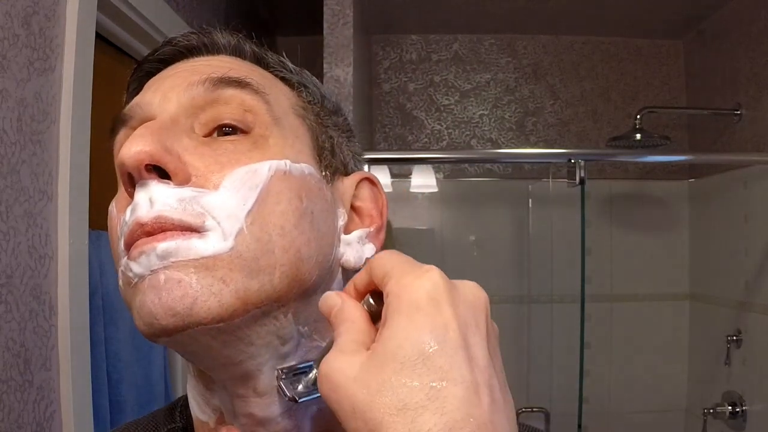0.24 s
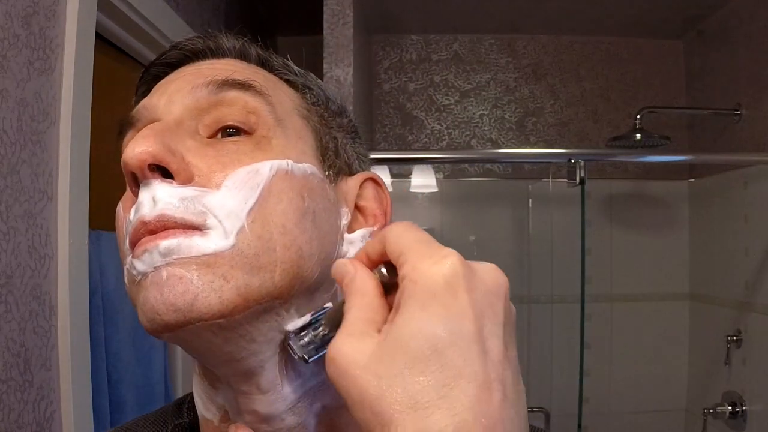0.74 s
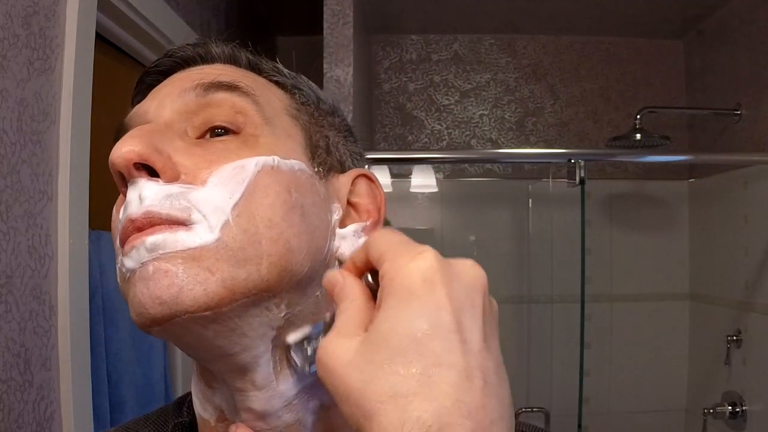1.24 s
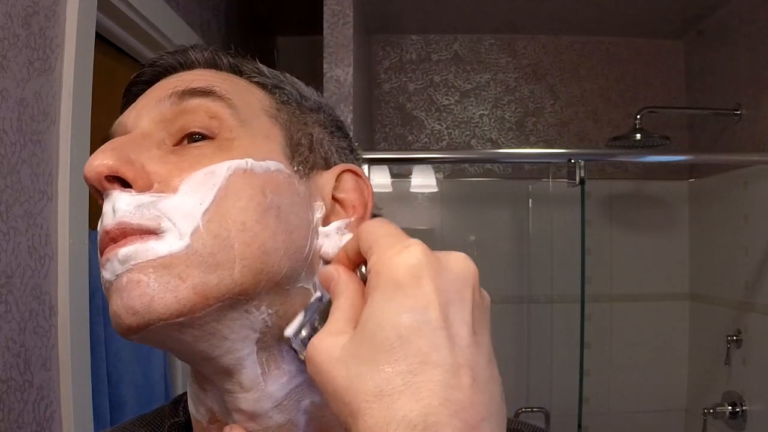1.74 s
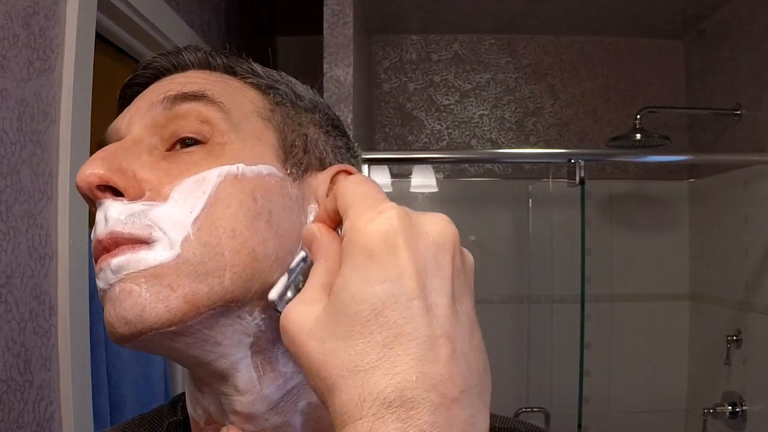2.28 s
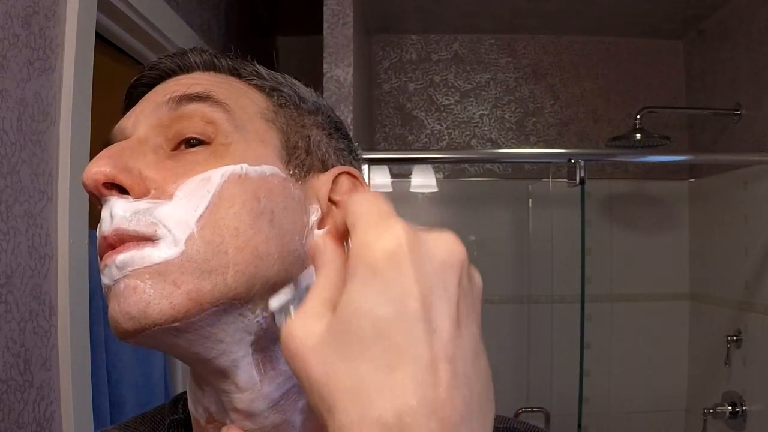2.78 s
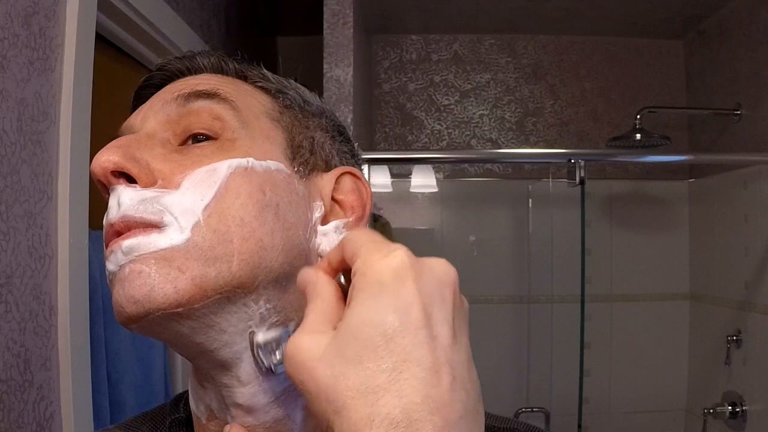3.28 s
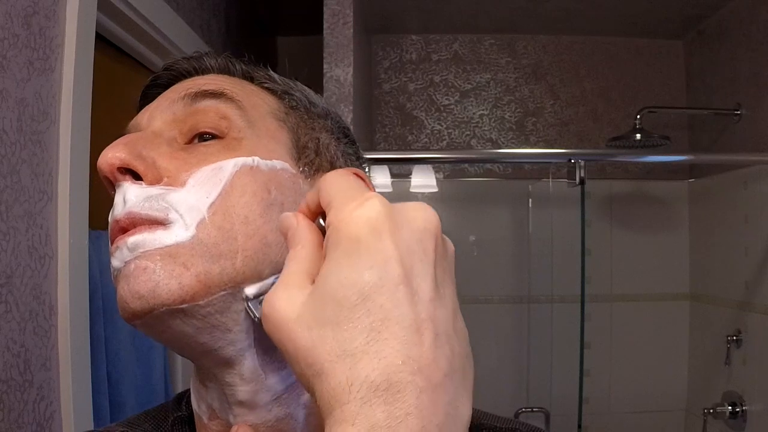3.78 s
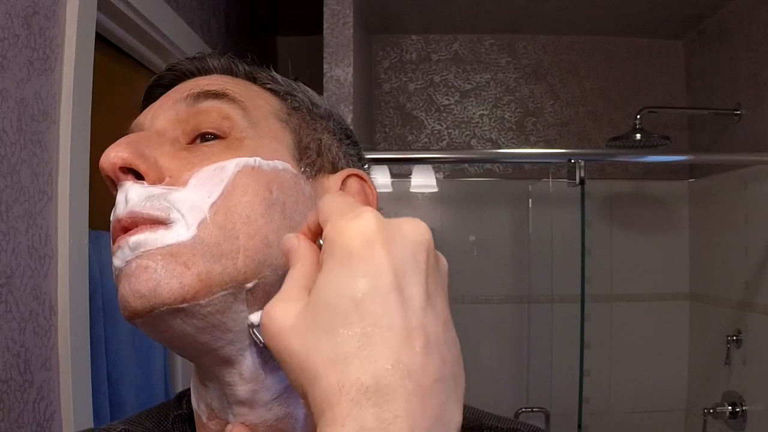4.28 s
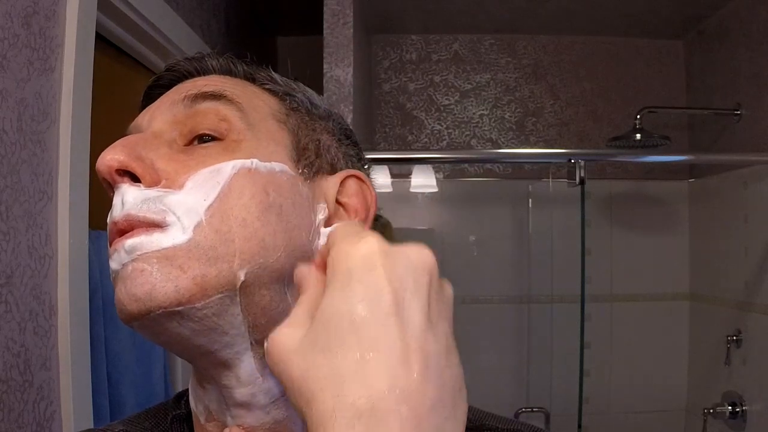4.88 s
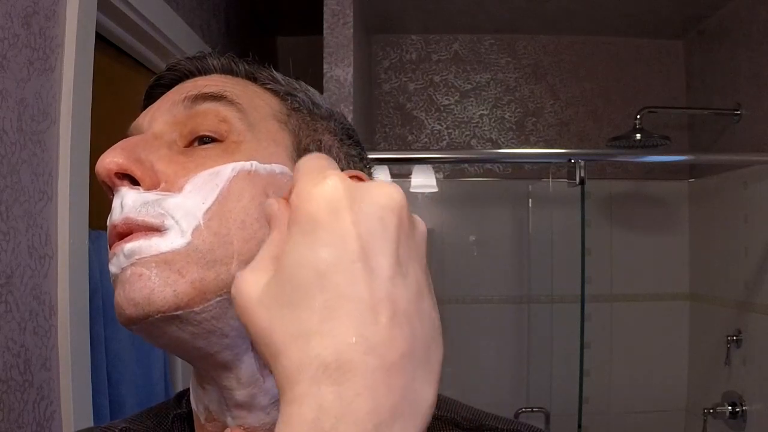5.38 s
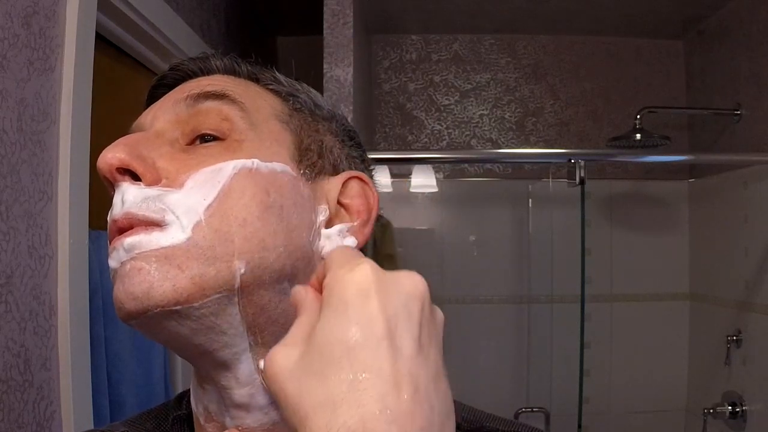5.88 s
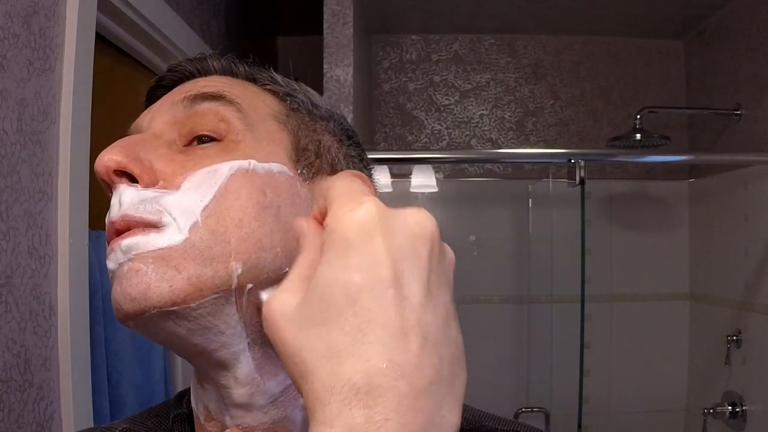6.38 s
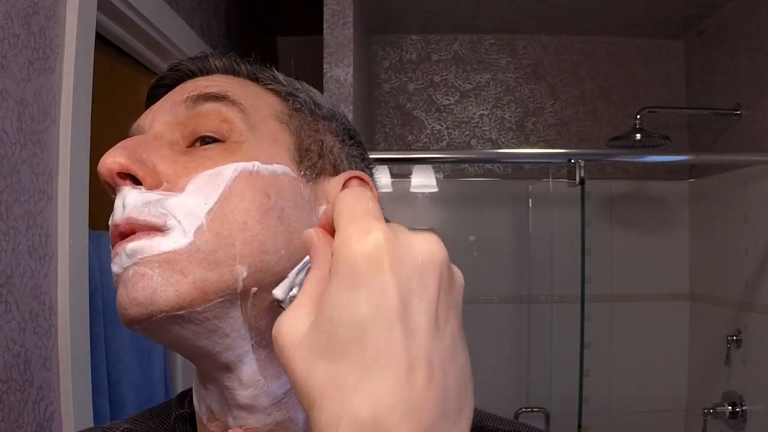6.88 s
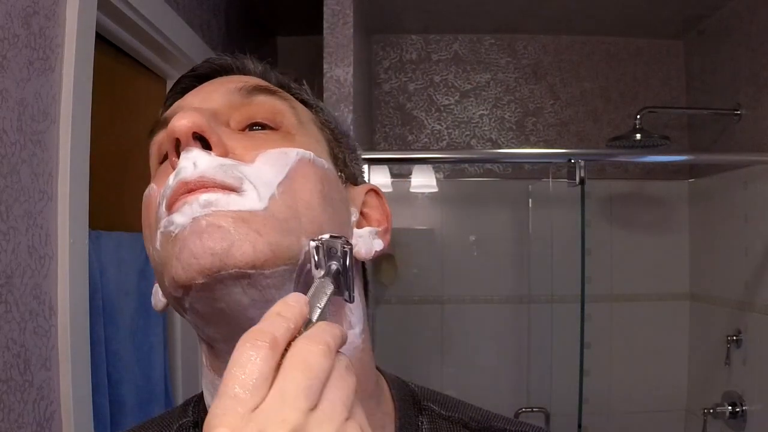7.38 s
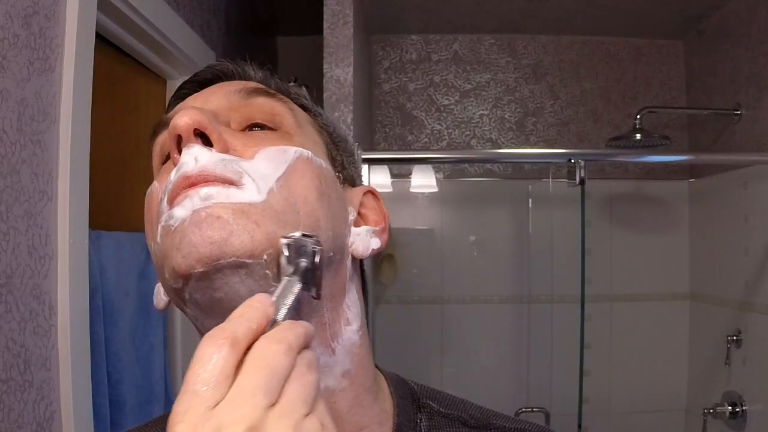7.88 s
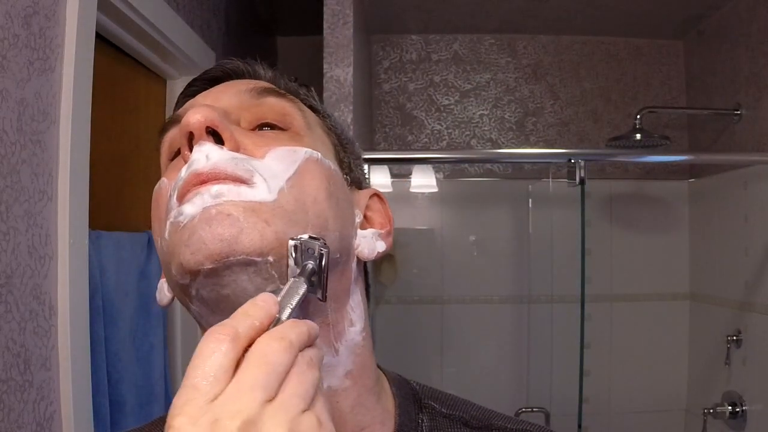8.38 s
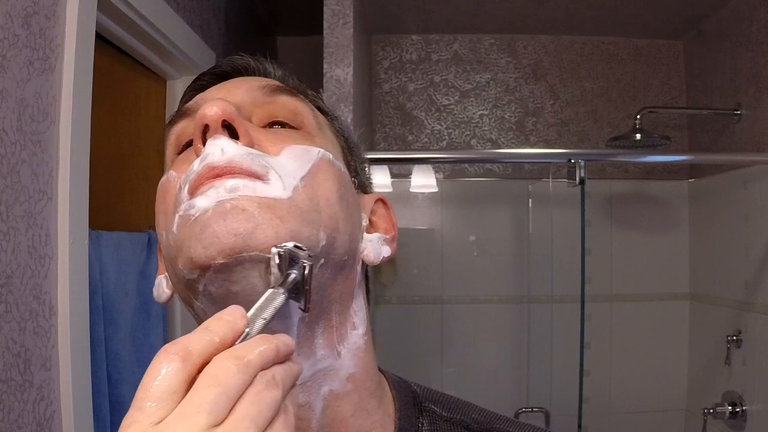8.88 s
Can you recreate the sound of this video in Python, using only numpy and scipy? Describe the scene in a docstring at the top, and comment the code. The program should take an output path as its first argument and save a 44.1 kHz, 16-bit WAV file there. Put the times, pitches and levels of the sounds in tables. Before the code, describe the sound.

Close, crisp razor strokes rasp through stubble with tiny ticks, while a low ventilation drone and hiss fill a tiled bathroom.

```python
"""A steel safety razor shaves lathered stubble in a small tiled bathroom, heard close and nearly in mono.
From the outset, ventilation drones behind a steady hiss. Short flicks on the neck come first: whiskers
snap at the blade and ring the razor head, while the moving arm rustles softly. Long pulls follow from
about 3 s, one ending in a squeak, then three short strokes on the jaw. At 7 s the hand changes grip,
and three coarser strokes pass under the chin."""
import sys
import numpy as np
from scipy import signal
from scipy.fft import rfft, irfft, next_fast_len
from scipy.io import wavfile
from scipy.ndimage import map_coordinates

SR = 44100
rng = np.random.default_rng(int(sys.argv[2]) if len(sys.argv) > 2 else 0)


def unload_wav(signal):
    """Save mono or channel-first audio to the path in sys.argv[1] as 16-bit WAV at rate SR, clipped to [-1, 1]."""
    wavfile.write(
        sys.argv[1],
        SR,
        np.round(np.clip(np.atleast_2d(signal).T, -1, 1) * 32767).astype(np.int16),
    )


N = 403074
T = np.arange(N) / SR

# Stereo width. Each row: frequency in Hz, side relative to mid in dB.
STEREO_WIDTH = [(25, -14.5), (60, -28.5), (130, -21.5), (300, -18.5), (600, -18), (1200, -13), (2500, -29),
                (6000, -22.5), (10000, -18.5), (14000, -33)]
# Spectrum of the scrape in a long pull. Each row: frequency in Hz, relative level in dB.
PULL_SPECTRUM = [(1200, -18), (2000, -15), (2700, -11.5), (3200, -3), (4100, -6), (5100, -3), (6100, -1.5),
                 (7300, -1.5), (7600, 4.5), (9100, 2.5), (10400, 1.5), (11700, 0.5), (13000, 0.5),
                 (14600, -0.8)]
# Damped modes of the razor head on the neck. Each row: frequency in Hz, width in Hz, lift in dB.
NECK_MODES = [(2350, 200, 3), (5080, 600, 7.5)]
# Razor strokes. Each row: start, length and bite-in time in seconds; level, swell from start to end,
# mid-stroke arch, relative low rasp, relative sharp top and arm rub, all in dB; kind of stroke.
RAZOR_STROKES = [ (0.502, 0.04, 0.006, -52, -5, 0.5, -20, 0, -62.5, "flick"),
                 (0.75, 0.086, 0.059, -45, -2.5, 0.5, -13.5, -1.5, -58, "flick"),
                 (1.04, 0.093, 0.073, -45.5, -0.5, 2, -11.5, -3.5, -57.5, "flick"),
                 (1.331, 0.101, 0.045, -48, 1.5, 1.5, -11, -4.5, -60.5, "flick"),
                 (1.616, 0.094, 0.048, -51.5, 3.5, 3, -10.5, -6, -62.5, "flick"),
                 (1.895, 0.14, 0.07, -58, 2, 0, -10, -3.5, -66, "flick"),
                 (2.218, 0.092, 0.05, -56, 7.5, -1, -12, -1.5, -72, "flick"),
                 (2.489, 0.053, 0.07, -47.5, 1.5, 1.5, -12, 0, -62, "flick"),
                 (2.715, 0.036, 0.026, -46.5, -0.5, 0, -11.5, 4.5, -63, "flick"),
                 (3.171, 0.13, 0.073, -50, -5, 2, -9.5, -3, -59.5, "pull"),
                 (3.472, 0.49, 0.085, -49, 7, 0.4, -11.5, -2, -61, "pull"),
                 (4.201, 0.59, 0.13, -48.5, -2.5, 1.2, -13, 0, -60.5, "pull"),
                 (5.074, 0.59, 0.06, -50.4, -1.5, 2.6, -12.8, 0, -62, "pull"),
                 (6.011, 0.3, 0.085, -52.5, 4, 1.5, -9.5, 3, -61, "pull"),
                 (6.328, 0.089, 0.082, -50.5, -8, -1, -4, -1, -72, "jaw"),
                 (6.622, 0.081, 0.074, -48.5, 1, 2, -2.5, 0, -58.5, "jaw"),
                 (6.886, 0.049, 0.06, -62, -2, 2, -11, 0, -76, "jaw"),
                 (7.662, 0.21, 0.011, -49.5, 6.5, -2.5, -3.5, 6, -65.5, "chin"),
                 (8.121, 0.19, 0.03, -49, 3.5, 3.5, -7.5, 1.5, -65, "chin"),
                 (8.543, 0.326, 0.036, -48.5, -5, -1, -8.5, 1, -66.5, "chin"), ]


def amp(db):
    """Amplitude grows tenfold for every 20 dB."""
    return 10 ** (np.asarray(db) / 20)


def unit(x):
    """Normalisation to an rms of 1."""
    return x / np.sqrt(np.mean(x ** 2) + 1e-20)


def along(points, hz):
    """Interpolation of (Hz, value) points on a logarithmic frequency axis."""
    freqs, values = np.transpose(points)
    return np.interp(np.log(hz + 1), np.log(freqs + 1), values)


def wobble(rate):
    """Smooth random modulation: a spline through `rate` Gaussian knots a second."""
    return map_coordinates(rng.standard_normal(int(N * rate / SR) + 4), [T * rate])


def lowpass(hz, corner_hz, order):
    """Low-pass gain: one half at the corner, a power-law roll-off above it."""
    return 1 / (1 + (hz / corner_hz) ** order)


def filtered(x, response):
    """Linear filtering: the spectrum of x is multiplied by a frequency response."""
    size = next_fast_len(N + SR // 2)
    return irfft(rfft(x, size) * response(np.fft.rfftfreq(size, 1 / SR)), size)[..., :N]


def coloured_noise(response):
    """Spectrally shaped stereo noise of rms 1; a weak side signal keeps it nearly mono."""
    def mid_and_side(hz):
        return response(hz) * np.array([np.ones(len(hz)), amp(along(STEREO_WIDTH, hz))])
    mid, side = filtered(rng.standard_normal((2, N)), mid_and_side)
    return unit(np.array([mid + side, mid - side]))


def ventilation(low_trim_db=-0.1, high_trim_db=-0.4, duct_db=-68, hiss_db=-54):
    """Resonance: ventilation drives the room's low modes into a wavering drone under an even hiss."""
    # Slow wavering. Each row: time in seconds, low and upper drone levels in dB before trim.
    wavering = [(0.0, -46, -67), (0.16, -61, -61.5), (0.48, -50, -55.6), (0.96, -60, -57.2),
                (1.92, -49.5, -58), (2.4, -59, -59), (3.03, -52.5, -60), (3.19, -51, -56.5),
                (5.11, -56, -53), (6.23, -62, -60), (6.55, -54, -50), (7.18, -56.5, -60.5),
                (7.5, -56.4, -55.5), (9.14, -53.1, -57.5)]
    # Room and duct modes. Each row: frequency in Hz, width in Hz, relative level in dB.
    low_modes = [(61, 3.9, -2), (71.8, 14, -16.5)]
    high_modes = [(101.3, 20, -4.5), (130.4, 11.5, -2.5)]
    duct_modes = [(212.4, 10.8, 4.5), (236, 15, -8), (276, 12, -1.5), (295.5, 15, -0.5), (427, 8.4, -20.5)]
    # Spectrum of the hiss. Each row: frequency in Hz, relative level in dB.
    hiss_spectrum = [(12, -2), (28, 0.5), (44, -3.5), (100, -8.5), (170, -15.5), (300, -17.5), (450, -25.5),
                     (650, -24.5), (1000, -25.5), (1400, -28), (3000, -29.5), (6000, -30.5), (15000, -33.5)]

    def hum(modes):
        return coloured_noise(
            lambda f: sum(amp(db) / (1 + (2 * (f - hz) / width) ** 2) for hz, width, db in modes))
    times, low_db, high_db = np.transpose(wavering)
    low = amp(np.interp(T, times, low_db) + low_trim_db) * hum(low_modes)
    high = amp(np.interp(T, times, high_db) + high_trim_db) * hum(high_modes)
    duct = amp(duct_db) * hum(duct_modes)
    hiss = amp(hiss_db) * coloured_noise(lambda f: amp(along(hiss_spectrum, f)))
    return low + high + duct + hiss


def resonator(spectrum, modes):
    """Minimum-phase response of a smooth spectrum lifted by damped resonances."""
    def response(f):
        lift_db = sum(db / (1 + (2 * (f - hz) / width) ** 2) for hz, width, db in modes)
        cepstrum = irfft(np.log(amp(along(spectrum, f) + lift_db)))
        half = len(cepstrum) // 2
        causal = np.concatenate([cepstrum[:1], 2 * cepstrum[1:half], np.zeros(half)])
        return np.exp(rfft(causal))
    return response


def ring_head(force, head, split_hz=3900, lowest_hz=900):
    """Forced vibration of the razor head, split into bright hiss and low rasp."""
    ring = filtered(force, lambda f: head(f) * (1 - lowpass(f, lowest_hz, 4)))
    rasp = filtered(ring, lambda f: lowpass(f, split_hz, 10))
    return ring - rasp, rasp


def snaps(trim_db=-2.5, body_db=-3, rasp_db=-2, top_db=5, top_hz=9500):
    """Impulse excitation: the blade lands or snaps a thick whisker, and the head cracks and rattles."""
    # Hard contacts. Each row: time in seconds, strength in dB, relative rasp and sharp top in dB.
    contacts = [(0.4494, -35, -14, -18), (0.5, -40, -21, -13), (0.503, -30.5, -25, -13),
                (0.551, -36, -27, -5), (0.7482, -35, -24, -20), (1.0365, -37, -24, -16),
                (1.3314, -35, -22, -7), (1.3673, -30.5, -32, -16), (2.1301, -46, -18, -4),
                (2.7182, -39, -25, -8), (3.18, -38.5, -17, -5), (3.4915, -45, -18, -9),
                (3.563, -31.5, -25, -3), (3.897, -28, -26, -13), (4.312, -40, -25, 1),
                (4.4554, -31, -10, -17), (5.1017, -35, -29, -3), (5.3512, -27, -24, -14),
                (5.659, -34, -25, -2), (6.0525, -33, -27, -10), (6.099, -35, -22, 2),
                (6.2308, -30.5, -13, -13), (6.238, -30, -13, -16), (6.3089, -27, -28, -10),
                (6.384, -36, -4, -14), (6.416, -37, -9, -14), (6.9406, -39, -22, -10),
                (7.6662, -37, -12, -11), (7.707, -33, -16, -9), (7.7285, -31, -23, -12),
                (7.8416, -26.5, -22, -13), (7.8475, -29, -20, -14), (8.1276, -39, -3, -17),
                (8.151, -39, -3, -16), (8.1946, -39, -16, -10), (8.2172, -36, -18, -12),
                (8.2405, -27, -21, -15), (8.2893, -33, -21, -16), (8.326, -32, -24, -9),
                (8.546, -33.5, -19, -21), (8.5939, -35, -20, -7), (8.8024, -30.5, -11, -18),
                (8.8326, -31, -8, -16), (8.9096, -37, -10, -27), (8.963, -39, -17.5, -4)]
    crack_decay_s, rattle_decay_s, rattle_db = 0.0005, 0.004, -9
    t = np.arange(SR // 50) / SR
    envelope = np.exp(-t / crack_decay_s) + amp(rattle_db) * np.exp(-t / rattle_decay_s)
    blows = np.zeros((3, N + SR))
    for start, db, coarse_db, sharp_db in contacts:
        crack = amp(db + trim_db) * envelope * rng.choice([-1, 1], len(t))
        band_gains = amp([[body_db], [top_db + sharp_db], [rasp_db + coarse_db]])
        blows[:, round(start * SR):][:, :len(t)] += band_gains * crack
    head = resonator(PULL_SPECTRUM, NECK_MODES)
    hiss, rasp = ring_head(blows[:, :N], head)
    hiss_gain, rasp_gain = np.std(ring_head(rng.standard_normal(N), head), axis=1)
    body = filtered(hiss[0], lambda f: lowpass(f, top_hz, 6))
    top = filtered(hiss[1], lambda f: 1 - lowpass(f, top_hz, 6))
    return (body + top) / hiss_gain + rasp[2] / rasp_gain


def hand_echoes(x, delays_s=(0.0007, 0.0016), drift=0.12, echo_db=-16):
    """Comb filtering: reflections from the moving hand and jaw interfere with the direct scrape."""
    echoes = [map_coordinates(x, [(T - delay * np.exp(drift * wobble(2))) * SR]) for delay in delays_s]
    return x + amp(echo_db) * sum(echoes)


def bathroom(x, wet_db=-12, delay_samples=130):
    """Reverberation: tiles and glass return a bright, exponentially decaying tail."""
    # Decay of the room. Each row: frequency in Hz, time to fall 60 dB in seconds.
    reverb_times = [(300, 0.57), (2000, 1), (6000, 0.28), (15000, 1)]
    hz, t, spectra = signal.stft(rng.standard_normal((2, SR // 2)), SR, nperseg=256)
    decay = amp(-60 * t / along(reverb_times, hz)[:, None])
    tail = signal.istft(spectra * decay, SR, nperseg=256)[1]
    tail = np.pad(tail / np.linalg.norm(tail[0]), ((0, 0), (delay_samples, 0)))
    mid, side = signal.fftconvolve(x[None], tail, axes=1)[:, :N]
    side = filtered(side, lambda f: amp(along(STEREO_WIDTH, f)))
    return x + amp(wet_db) * (mid + np.array([side, -side]))


def movement(start, length, rise, fall_db_per_s, swell_db, arch_db, touch_db=-13.5):
    """Amplitude envelope of a movement: a light touch, a swell and arch, then exponential decay."""
    t = T - start
    progress = np.clip(t / length, 0, 1)
    ease_db = touch_db * np.clip(1 - t / rise, 0, 4) ** 2
    hold_db = swell_db * (progress - 0.5) + arch_db * (1 - (2 * progress - 1) ** 2)
    return amp(ease_db + hold_db - fall_db_per_s * np.clip(t - length, 0, 1))


def arm_rustle(lead_s=0.017, longest_push_s=0.44, flutter_db=1.2, idle_db=-71):
    """Friction noise: sleeve and skin rub dully as the arm drives each stroke or changes grip."""
    # Spectrum of the rub. Each row: frequency in Hz, relative level in dB.
    rub_spectrum = [(120, -42.5), (230, -6.5), (330, -3.5), (450, -2), (620, -10.5), (900, -11.5),
                    (1400, -22), (3000, -29.5)]
    # Room modes that it excites. Each row: frequency in Hz, width in Hz, lift in dB.
    room_modes = [(422, 18, 3), (439, 24, 4.5), (474, 6.8, 1), (498, 17, -1), (580, 22, 7)]
    # The hand swings round to the chin. One row: start, length and rise in seconds, rub in dB.
    grip_change = (7, 0.47, .04, -63.5)
    pushes = [(start - lead_s, min(length, longest_push_s), bite, rub_db)
              for start, length, bite, *_, rub_db, _ in RAZOR_STROKES]
    power = sum((amp(db) * movement(start, length, rise, fall_db_per_s=150, swell_db=-1, arch_db=1)) ** 2
                for start, length, rise, db in pushes + [grip_change])
    level = np.sqrt(power + amp(idle_db) ** 2) * amp(flutter_db * wobble(35))
    return level * coloured_noise(resonator(rub_spectrum, room_modes))


def whiskers(per_s, spread_db, decay_s, smear_db, tick_db):
    """Shot noise: whiskers part at uneven moments, each with a tick and a tear, over smearing lather."""
    count = int(per_s * N / SR)
    onsets = ((np.arange(count) + rng.uniform(0, 2, count)) * N / (count + 2)).astype(int)
    sizes = amp(spread_db * np.clip(rng.standard_normal(count), -2, 1.5))
    energy = signal.lfilter([1], [1, -np.exp(-2 / (decay_s * SR))], np.bincount(onsets, sizes ** 2, N))
    tearing = unit(np.sqrt(energy) * rng.standard_normal(N))
    ticks = unit(np.bincount(onsets, sizes * rng.choice([-1, 1], count), N))
    lather = amp(smear_db) * rng.standard_normal(N)
    return tearing + amp(tick_db) * ticks + lather


def stubble(per_s, spread_db, decay_s, smear_db, tick_db, patchy_db, crossover_hz=9500):
    """Fracture noise: thick whiskers crack dully, thin ones sharply; uneven growth varies the level."""
    thick = whiskers(per_s, spread_db, decay_s, smear_db, tick_db)
    thin = whiskers(per_s, spread_db + 3.5, decay_s, smear_db - 0.5, tick_db)
    dull = filtered(thick, lambda f: lowpass(f, crossover_hz, 4) ** 0.5)
    sharp = filtered(thin, lambda f: (1 - lowpass(f, crossover_hz, 4)) ** 0.5)
    return (dull + sharp) * amp(patchy_db * wobble(45))


def scrape(kind, head, cuts, hiss_db, rasp_db, drift, drift_rate=7, top_hz=10500, lift_db_per_s=261):
    """A loaded resonator: strokes of one kind excite the head as the changing skin load detunes it."""
    body_gain, rasp_gain, top_gain = np.zeros((3, N))
    for start, length, bite, db, swell_db, arch_db, coarse_db, sharp_db, _, stroke_kind in RAZOR_STROKES:
        if stroke_kind == kind:
            cutting = amp(db) * movement(start, length, bite, lift_db_per_s, swell_db, arch_db)
            body_gain += cutting
            rasp_gain += amp(coarse_db) * cutting
            top_gain += amp(sharp_db) * cutting
    warped_samples = (T + drift / drift_rate * wobble(drift_rate)) * SR
    hiss, rasp = (unit(map_coordinates(band, [warped_samples], order=5, mode="mirror"))
                  for band in ring_head(cuts, head))
    body = filtered(hiss, lambda f: lowpass(f, top_hz, 10))
    top = hiss - body
    return amp(hiss_db) * (body_gain * body + top_gain * top) + amp(rasp_db) * rasp_gain * rasp


def shaving():
    """Source and filter: stubble, sparsest on the chin, drives a head whose response varies with grip."""
    # Spectra of the scrape in each grip. Each row: frequency in Hz, relative level in dB.
    flick_spectrum = [(1200, -20), (2000, -9.5), (2700, -7), (3100, -1.5), (4100, -3), (5100, -3),
                      (6200, -1), (7300, 2), (7700, 4), (9000, 4.5), (10500, 1.5), (11800, 5.5),
                      (13000, 2.5), (14600, 4)]
    jaw_spectrum = [(1200, -19), (1800, -9), (2250, 4), (2700, -1), (3300, 3.5), (3800, -4), (4600, -0.5),
                    (6200, -3.5), (9000, 1.5), (12000, -1.5), (14600, -3)]
    chin_spectrum = [(1000, -6), (1500, -11), (2200, -3.5), (3300, -1.5), (3800, -4.5), (4900, 2),
                     (5600, 1), (7100, -3), (7700, -2), (9100, .5), (10600, -5), (11900, 2.5), (13000, -4),
                     (14800, -1.5)]
    # Damped modes of the head on jaw and chin. Each row: frequency in Hz, width in Hz, lift in dB.
    jaw_modes = [(1620, 150, 2), (2430, 380, 2.6), (5130, 450, 2.9)]
    chin_modes = [(1535, 110, 9.6), (1910, 120, 7.4), (2225, 70, 12.5), (2900, 130, 2.3), (3360, 360, 5.6),
                  (4970, 420, 6.5)]
    fine = stubble(per_s=650, spread_db=4.5, decay_s=0.0017, smear_db=-2.5, tick_db=-16.5, patchy_db=0.9)
    medium = stubble(per_s=480, spread_db=5, decay_s=0.0023, smear_db=-2.5, tick_db=-13, patchy_db=1.1)
    stiff = stubble(per_s=280, spread_db=2.5, decay_s=0.0028, smear_db=-3.5, tick_db=-10, patchy_db=0.54)
    flicks = scrape("flick", resonator(flick_spectrum, NECK_MODES), fine,
                    hiss_db=2.1, rasp_db=-0.7, drift=0.012)
    pulls = scrape("pull", resonator(PULL_SPECTRUM, NECK_MODES), medium,
                   hiss_db=0.16, rasp_db=-1, drift=0.011)
    jaw = scrape("jaw", resonator(jaw_spectrum, jaw_modes), fine, hiss_db=1.5, rasp_db=-2.5, drift=0.008)
    chin = scrape("chin", resonator(chin_spectrum, chin_modes), stiff, hiss_db=0, rasp_db=0.5, drift=0.005)
    return flicks + pulls + jaw + chin


def squeaks(attack_s=0.001, decay_s=0.0037, trim_db=1, roughness_rad=0.8):
    """Stick-slip friction: the blade edge sings roughly for a moment as it leaves the skin."""
    # Squeaks of the edge. Each row: start in seconds, strength in dB, frequency in Hz.
    slips = [(5.675, -41.5, 4080), (5.684, -47, 4020)]
    out = np.zeros(N)
    t = np.arange(SR // 20) / SR
    envelope = np.exp(-t / decay_s) * (1 - np.exp(-t / attack_s))
    for start, db, hz in slips:
        phase = 2 * np.pi * hz * t + roughness_rad * wobble(700)[:len(t)]
        out[round(start * SR):][:len(t)] += amp(db + trim_db) * np.sin(phase) * envelope
    return out


def scene():
    """Superposition: the razor and its reflections add to the arm's rustle and the ventilation."""
    razor = hand_echoes(shaving() + snaps() + squeaks())
    return bathroom(razor) + arm_rustle() + ventilation()


def record(dry):
    """Band limiting: an ideal low-pass removes everything above 15.5 kHz."""
    return filtered(dry, lambda hz: hz < 15500)


dry = scene()
out = record(dry)
unload_wav(out)
```